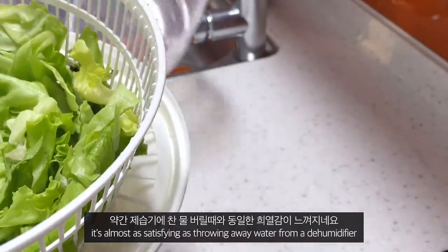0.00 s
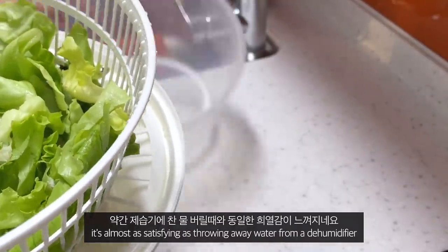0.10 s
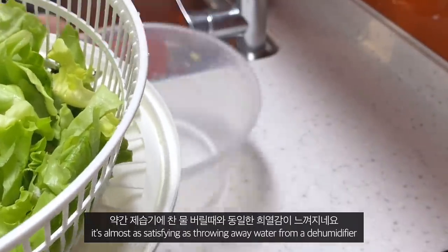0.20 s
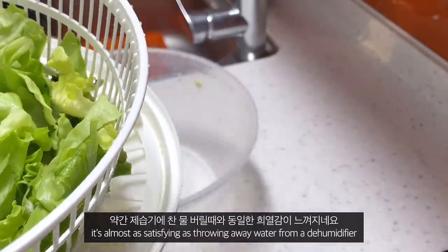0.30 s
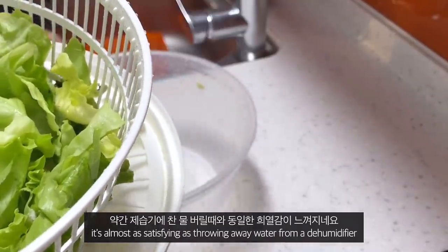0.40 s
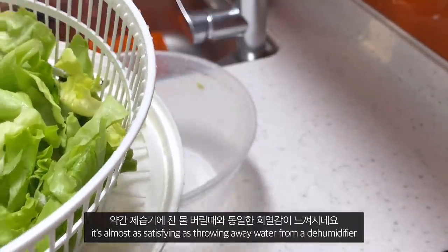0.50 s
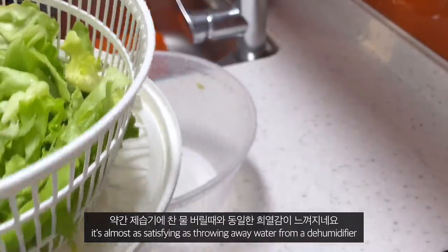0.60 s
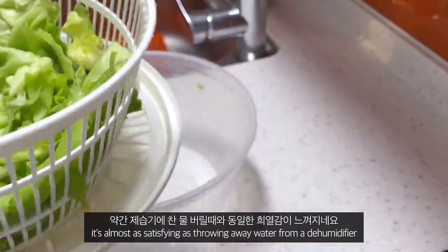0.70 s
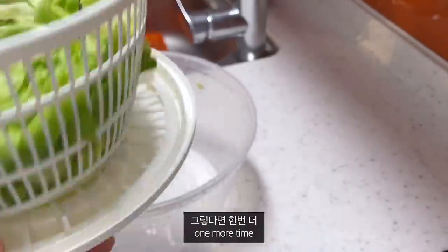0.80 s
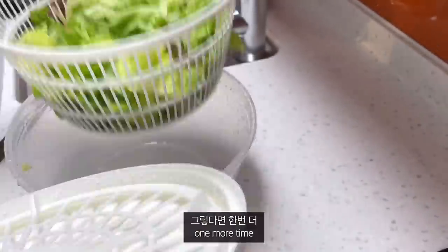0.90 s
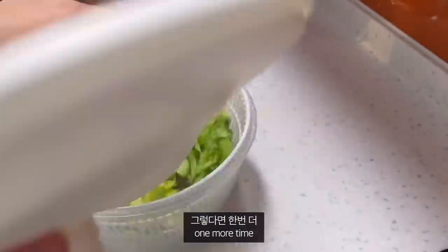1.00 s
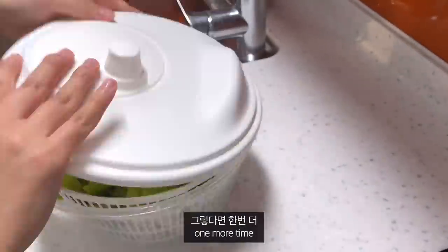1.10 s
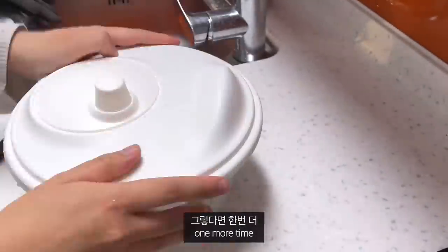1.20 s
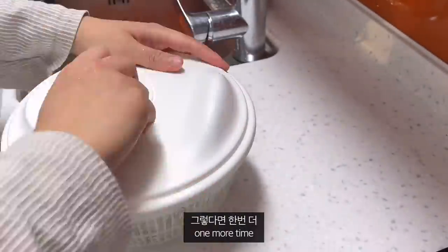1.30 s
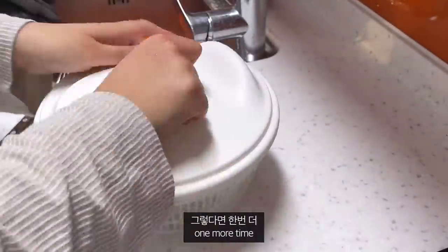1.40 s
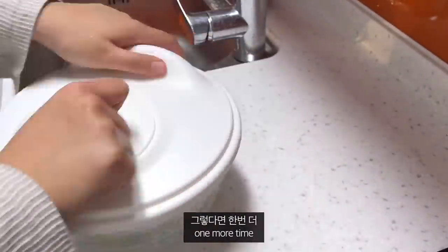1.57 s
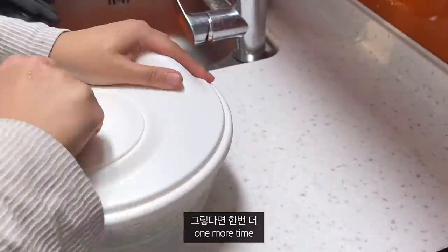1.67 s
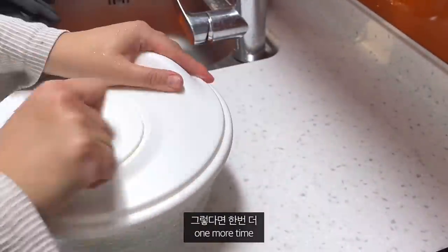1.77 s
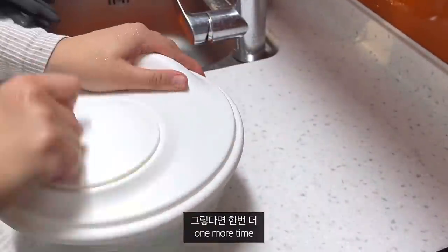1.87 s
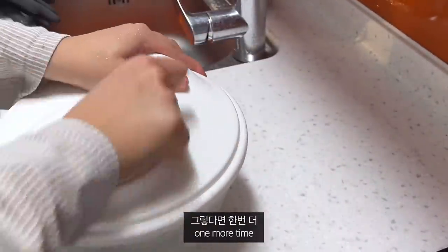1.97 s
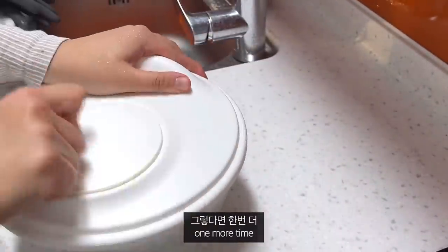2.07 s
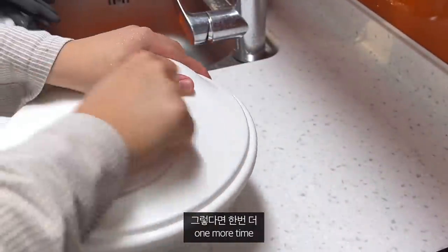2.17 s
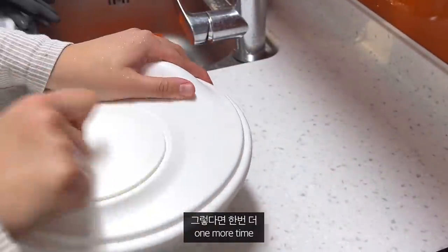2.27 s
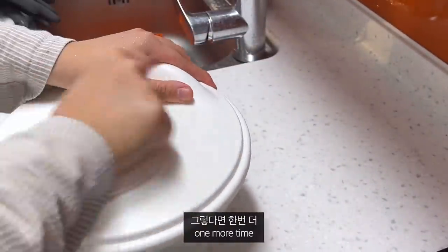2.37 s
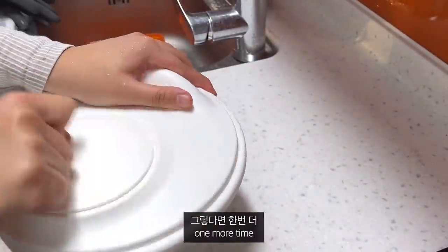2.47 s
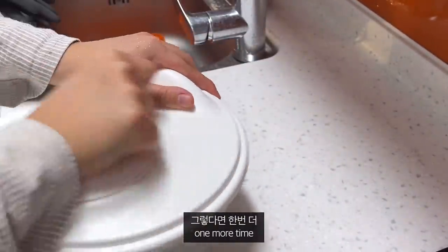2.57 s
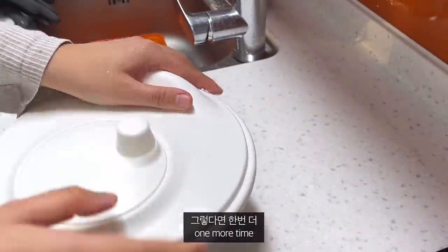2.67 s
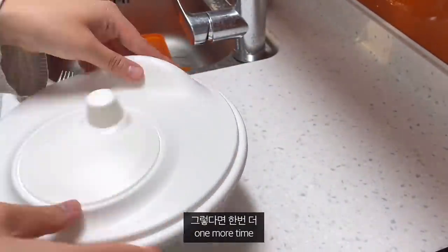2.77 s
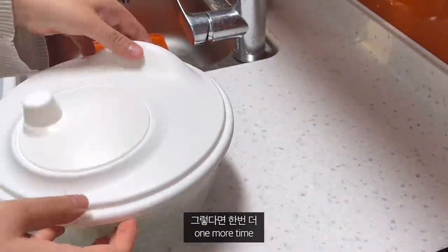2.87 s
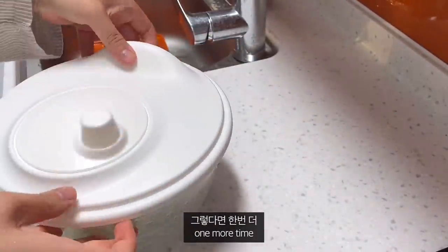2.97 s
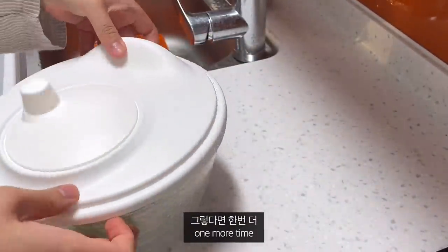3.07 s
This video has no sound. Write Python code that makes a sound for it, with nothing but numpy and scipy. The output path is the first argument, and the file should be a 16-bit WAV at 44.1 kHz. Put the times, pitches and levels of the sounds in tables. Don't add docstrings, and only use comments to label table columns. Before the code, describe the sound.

A plastic salad spinner is set down, clattered together, cranked in quick toothy bursts, then whirs on

```python
import sys
import numpy as np
from scipy import signal
from scipy.fft import rfft, irfft, next_fast_len
from scipy.io import wavfile
from scipy.ndimage import uniform_filter1d, map_coordinates

SR = 44100
rng = np.random.default_rng(int(sys.argv[2]) if len(sys.argv) > 2 else 0)


def master(y):
    cut = np.clip(np.atleast_2d(y).T, -1, 1)
    pcm = np.round(cut * 32767)
    wavfile.write(sys.argv[1], SR, pcm.astype(np.int16))


def volts_from_db(level):
    exponent = np.asarray(level, float) / 20
    return 10 ** exponent


N = 138915
T = np.arange(N) / SR
SCENE_CHANGE_S = 0.786

# pitch in Hz, level in dB, time to fade by 60 dB in seconds.
BOWL_NOTES = [(250, -9, 0.065), (334.4, -7, 0.086), (437, -6.5, 0.077), (543, -7, 0.078), (705, 6.5, 0.029),
              (950, -19, 0.073), (1282, -5.5, 0.029), (1700, -12, .03), (2035, -14, 0.044),
              (2303, -18.5, 0.058), (3080, -41, .05)]
# start in seconds, level in dB.
BOWL_LANDINGS = [
    (.2433, -6),
    (.251, -15.5),
    (.266, -17.5),
    (.292, -35),
    (.352, -39),
    (.362, -28),
]
# frequency in Hz, level in dB per Hz.
BOWL_CRACK = [(120, -17.5), (760, -26.5), (2280, -32.5), (7500, -55), (9000, -83)]
# start in seconds, level in dB.
BOWL_TICKS = [(0.634, -28.5), (0.667, -23), (0.6879, -28)]
# start in seconds, level in dB, rise in seconds, 60 dB fade in seconds.
CUPBOARD_BOOMS = [
    (0.245, -13.5, 0.044, 0.12),
    (0.39, -27.5, 0.048, 0.099),
]
# start in seconds, peak in dB, own pitch in Hz, hollow thump over crack in dB.
CLATTER_HITS = [(.936, -36, 5100, -1), (0.9489, -18, 2190, -15.5), (0.977, -28, 3100, -40),
                (0.9828, -10, 3150, -21), (1.012, -27, 2350, -1.5), (1.052, -19, 4300, -15),
                (1.0767, -3, 1916, -27), (1.0915, -10, 1740, -36), (1.1039, -9.5, 1663, -11),
                (1.1204, -5.5, 1517, -24), (1.1302, -13.5, 1500, -8), (1.167, -19, 4200, -4),
                (1.1781, -14, 1104, -10), (1.1926, -8.5, 3020, -11), (1.1973, -4.5, 769, -20),
                (1.2638, -13.5, 1413, -6.5), (1.3071, -24, 2100, -3.5), (1.35, -8, 1623, 1),
                (1.503, -28, 3040, -9), (1.5309, -23.5, 2024, -4), (1.5981, -21.5, 3010, -8.5),
                (1.6344, -45, 594, 21)]
# frequency in Hz, level in dB per Hz.
PLASTIC_CRACK = [(120, -13), (500, -9), (1740, -4), (6500, -7), (14100, -16.5), (17000, -37)]
# pitch in Hz, level in dB, time to fade by 60 dB in seconds.
LID_NOTES = [(265.4, -8.5, 0.069), (313.6, -5, 0.13), (516, -7.5, 0.074), (670, 4, 0.056),
             (1050, 3.5, 0.014), (2070, -4, 0.038)]
# start in seconds, peak in dB.
RIM_GRAZES = [(2.421, -8.5), (2.635, -10), (2.688, -26), (2.717, -12.5), (2.745, -30), (2.779, -23),
              (2.795, -9.5), (2.858, -8), (2.89, -19.5), (2.95, -13), (2.966, -15.5), (3.073, -15.5)]
# start in seconds, length in seconds, level in dB, gear teeth passing in Hz.
CRANK_STROKES = [(1.714, 0.0555, -28.5, 520), (1.814, 0.03614, -24, 637.5), (1.886, 0.037, -22, 665),
                 (1.961, 0.0348, -22.5, 664.7), (2.022, 0.0422, -20, 700), (2.091, 0.0314, -22, 680),
                 (2.161, .032, -22, 679), (2.227, 0.0374, -21, 670), (2.286, 0.032, -20.5, 688),
                 (2.323, 0.0095, -26.5, 659.8), (2.361, 0.0245, -19.5, 669.2), (2.43, 0.0354, -21, 679.6),
                 (2.488, 0.0456, -20.5, 690), (2.571, 0.039, -25, 665)]
# multiple of the tooth rate, level in dB.
GEAR_OVERTONES = [(1, 6.5), (2, -4), (3, 1.5), (5, -0.5)]
# frequency in Hz, level in dB per Hz.
GRIND_COLOUR = [(120, -45), (220, -13.5), (942, -18), (3270, -10.5), (6500, -8.5), (15500, -25),
                (16050, -70)]
# frequency in Hz, width in Hz, level in dB.
SHELL_PEAKS = [(700, 75, 19), (1500, 44, 11), (1900, 230, 7.5), (3170, 620, 10.5)]
# start in seconds, level in dB.
BOWL_JOLTS = [(1.82, -27.5), (2.094, -21.5), (2.364, -25), (2.578, -17.5)]
# time in seconds, level in dB.
BASKET_LEVEL = [
    (1.36, -45),
    (1.64, -39),
    (1.75, -30.5),
    (2.2, -29.5),
    (2.621, -30),
    (2.9, -34),
    (3.15, -39.5),
]
# frequency in Hz, level in dB per Hz.
WHIRR_COLOUR = [(100, -100), (214, -7), (690, -12.5), (3000, -22.5), (6500, -21), (8500, -26),
                (15600, -25.5), (16050, -76)]
# start in seconds, peak in dB, own pitch in Hz.
SETTLING_TAPS = [(1.114, -11.5, 1560), (1.1235, -11.5, 1220), (1.148, -31, 4000), (1.2055, -14, 3100),
                 (1.212, -16.5, 1580), (1.255, -34, 6000), (1.369, -26, 3500), (1.404, -28.5, 1610),
                 (1.419, -36.5, 5060), (1.431, -38, 2980), (1.4587, -31, 2002), (1.584, -33.5, 6000),
                 (1.636, -28.5, 640), (1.658, -32, 1530), (1.9665, -18, 3270), (1.987, -19, 5230),
                 (2.0245, -19, 2100), (2.062, -20, 5900), (2.096, -23.5, 3000), (2.166, -14, 2890),
                 (2.609, -21.5, 5200), (2.66, -24.5, 3350), (2.686, -17.5, 1800), (2.697, -35, 1900),
                 (2.746, -25.5, 5540), (2.751, -19, 800), (2.782, -29, 6500), (2.863, -25, 5460),
                 (2.905, -32, 1700), (3.006, -37, 9160), (3.022, -26, 1100), (3.037, -28, 1780),
                 (3.054, -26, 900), (3.085, -28, 1090), (3.122, -32, 1300)]
# start in seconds, length in seconds, level in dB, centre in Hz.
BRUSHES = [(.401, 0.044, -71, 11500), (.48, .02, -60, 12100), (0.518, 0.046, -62, 10500),
           (0.625, 0.011, -56, 11300), (0.658, 0.037, -59, 3750), (0.756, 0.025, -72, 11500),
           (.812, 0.009, -65, 8000), (0.826, 0.02, -52.5, 12600), (1.08, .025, -29, 1850),
           (1.109, 0.029, -27.5, 1530), (0.872, 0.0082, -53, 12600), (0.917, 0.014, -53, 13000),
           (1.052, 0.0073, -41, 5050), (1.384, 0.019, -50, 9000), (1.493, 0.022, -48, 5000),
           (1.525, 0.022, -43.5, 4840), (1.66, 0.041, -52, 4000)]
# start in seconds, level in dB, pitch in Hz.
SINK_DROPS = [(0.2044, -30.5, 3170), (0.4504, -28, 2940), (0.5496, -31, 3400), (0.7362, -32, 2960)]
# pitch in Hz, width in Hz, level in dB.
HUM_SLOW = [(154.3, 8.3, -46), (96.7, 28, -50.5), (55.2, 8.4, -56)]
# pitch in Hz, width in Hz, level in dB.
HUM_FAST = [(659.4, 24, -45), (523, 23, -48)]
# frequency in Hz, level in dB per Hz.
AIR_SLOW = [(25, -27), (150, 1), (500, -8), (7000, -35.5), (11000, -30), (15000, -45)]
# frequency in Hz, level in dB per Hz.
AIR_FAST = [(120, -62), (210, 10.5), (650, -3), (900, -2.5), (8000, -16.5), (15500, -18), (16000, -70)]
# frequency in Hz, time to fade by 60 dB in seconds.
KITCHEN_ECHO = [(200, 0.57), (2000, 0.24), (10000, 0.12)]
# frequency in Hz, likeness from 0 to 1.
ALIKE_SLOW = [(60, 0.84), (950, 0.12), (15000, 0.13)]
# frequency in Hz, likeness from 0 to 1.
ALIKE_FAST = [(60, 0.97), (380, 1), (2380, 0.45), (15000, 0.13)]
# frequency in Hz, likeness from 0 to 1.
ALIKE_CRACK = [(60, 1), (500, 0.91), (1400, 0.2), (2800, 0.58), (15000, 0.2)]
# frequency in Hz, left over right in dB.
LEAN_SLOW = [(60, -4), (950, 1.5), (15000, 2)]
# frequency in Hz, left over right in dB.
LEAN_FAST = [(200, 0), (700, -3), (1400, 9.5), (2800, 1), (15000, 2.5)]


def unit(x):
    return x / np.sqrt(np.mean(x ** 2) + 1e-20)


def along(points, hz):
    f, value = np.transpose(points)
    return np.interp(np.log(hz + 1), np.log(f + 1), value)


def wobble(rate):
    return map_coordinates(rng.standard_normal(int(N * rate / SR) + 4), [T * rate])


def filtered(x, response):
    m = next_fast_len(N + SR // 2)
    return irfft(rfft(x, m) * response(np.fft.rfftfreq(m, 1 / SR)), m)[..., :N]


def peak(f, hz, width):
    return 1j * f * width / (hz * hz - f * f + 1j * f * width)


def noise(spectrum, alike, peaks=()):
    def shape(f):
        turn = np.arccos(np.clip(along(alike, f), -1, 1)) / 2
        body = 1 + sum(volts_from_db(db) * np.abs(peak(f, hz, width)) for hz, width, db in peaks)
        return volts_from_db(along(spectrum, f)) * body * [np.cos(turn), np.sin(turn)]
    mid, side = filtered(rng.standard_normal((2, N)), shape)
    return unit(np.array([mid + side, mid - side]))


def patchy(x, depth_db):
    z = signal.stft(x, nperseg=256)[2]
    field = uniform_filter1d(rng.standard_normal(z.shape[1:]), size=4, axis=0)
    field = uniform_filter1d(field, size=3, axis=1)
    return unit(signal.istft(z * volts_from_db(depth_db * unit(field)), nperseg=256)[1][:, :N])


def hits(rows, modes, crack, attack_s, scatter_db, life_s):
    roughness = 7e-5
    out, t = np.zeros((2, N + SR)), np.arange(SR // 7) / SR
    hz, level, t60 = np.transpose(modes)[:, :, None]
    crack = np.pad(crack, ((0, 0), (0, SR)))
    for s, db, ring_db, own_hz in rows:
        i = round(s * SR)
        level_draw, pitch_draw = rng.standard_normal((2, len(modes), 1))
        steps = rng.standard_normal((len(modes) + 1, len(t)))
        drift = uniform_filter1d(np.cumsum(steps, axis=1), size=24)
        phase = 2 * np.pi * hz * (1 + 0.016 * pitch_draw) * t + roughness * hz * drift[1:]
        ring = (volts_from_db(level + scatter_db * level_draw - 60 * t / t60) * np.sin(phase)).sum(0)
        own = volts_from_db(1 - 60 * t / 0.059) + volts_from_db(16.5 - 60 * t / 0.0099)
        own = own * np.sin(2 * np.pi * own_hz * t + .2 * drift[0])
        scrape, click = volts_from_db(-60 * t / life_s), volts_from_db(20 - 60 * t / 0.0049)
        burst = (scrape + click) * crack[:, i:i + len(t)]
        onset = 1 - np.exp(-t / attack_s)
        out[:, i:i + len(t)] += (volts_from_db(db) * (burst + own) + volts_from_db(ring_db) * ring) * onset
    return out[:, :N]


def bowl():
    landings = [(s, db - 14, db - 0.5, 1300) for s, db in BOWL_LANDINGS]
    ticks = [(s, db - 22.5, db - 44, 1400) for s, db in BOWL_TICKS]
    boom = np.zeros(N)
    for s, db, rise, t60 in CUPBOARD_BOOMS:
        t = np.clip(T - s, 0, 1)
        swell = np.clip(t / rise, 0, 1) * volts_from_db(db - 60 * np.clip(t - rise, 0, 1) / t60)
        boom += swell * np.sin(2 * np.pi * 152.6 * t)
    crack = noise(BOWL_CRACK, ALIKE_SLOW)
    return boom + hits(landings + ticks, BOWL_NOTES, crack, attack_s=0.00098, scatter_db=-2.0, life_s=0.12)


def clatter():
    rows = [(s, db - 14, db + thump_db - 2.0, hz) for s, db, hz, thump_db in CLATTER_HITS]
    rim = [(s, db - 20.5, db - 20, 1500) for s, db in RIM_GRAZES]
    crack, scrape = noise(PLASTIC_CRACK, ALIKE_CRACK), noise(GRIND_COLOUR, ALIKE_FAST)
    return (hits(rows, LID_NOTES, crack, attack_s=0.0012, scatter_db=0.0, life_s=0.051)
            + hits(rim, LID_NOTES, scrape, attack_s=0.003, scatter_db=3.0, life_s=0.023))


def crank():
    rise_s, fall_s, sag, jitter = 0.0066, 0.0054, .05, 0.02116
    load, rate = np.zeros(N), np.full(N, 670.)
    for s, length, db, hz in CRANK_STROKES:
        t = T - s
        load += volts_from_db(db) * np.clip(t / rise_s, 0, 1) * np.exp(-np.clip(t - length, 0, 1) / fall_s)
        sagging = hz * (1 + sag * (.5 - np.clip(t / length, 0, 1.5)))
        rate = np.where(t > 0, sagging, rate)
    turn = 2 * np.pi * np.cumsum(rate * (1 + jitter * wobble(250))) / SR
    tone = sum(volts_from_db(db + 2.5 * wobble(60)) * np.sin(k * turn + rng.uniform(0, 4.15)) for k, db in GEAR_OVERTONES)
    gate = 1 + 0.29 * np.sin(turn)
    flutter = volts_from_db(1.4 * wobble(150) + 1.6 * wobble(1500))
    grind = unit(gate * flutter * patchy(noise(GRIND_COLOUR, ALIKE_FAST, SHELL_PEAKS), depth_db=3.5))
    jolts = [(s, db - 4.0, db, 520) for s, db in BOWL_JOLTS]
    jolt = hits(jolts, LID_NOTES, grind, attack_s=0.0014, scatter_db=0.5, life_s=0.009)
    return jolt + load * (volts_from_db(-2.5) * unit(tone) + volts_from_db(0.5) * grind)


def basket():
    fizz_growth, fizz_hz = 1.92, 2300
    s, db = np.transpose(BASKET_LEVEL)
    level = np.interp(T, s, db, left=-120)
    whirr = patchy(noise(WHIRR_COLOUR, ALIKE_FAST, SHELL_PEAKS), depth_db=2.5)
    fizz = filtered(whirr, lambda f: f ** 2 / (f ** 2 + fizz_hz ** 2))
    fizz_db = (fizz_growth - 1) * (level - max(db)) + 3 + 1.7 * wobble(90)
    unsteady = volts_from_db(level + 1.2 * wobble(40) + 1.5 * wobble(200))
    return unsteady * (whirr - fizz + volts_from_db(fizz_db) * fizz)


def taps():
    rows = [(s, db - 15.5, db - 21.5, hz) for s, db, hz in SETTLING_TAPS]
    crack = noise(PLASTIC_CRACK, ALIKE_CRACK)
    dull = filtered(crack, lambda f: 1 / (1 + (f / 3500) ** 2))
    low = [row for row in rows if row[-1] < 2000]
    high = [row for row in rows if row[-1] >= 2000]
    return sum(hits(group, LID_NOTES, x, attack_s=0.00063, scatter_db=4.0, life_s=0.027)
               for group, x in ((low, dull), (high, crack)))


def rustles():
    rise_s, fall_s, wide = 0.0022, 0.0074, 0.3
    out, t = np.zeros((2, N)), np.arange(SR // 8) / SR
    for s, length, db, hz in BRUSHES:
        edges = np.clip([hz * (1 - wide), hz * (1 + wide)], 500, 15500)
        sos = signal.butter(3, edges, 'band', fs=SR, output='sos')
        band = unit(signal.sosfilt(sos, rng.standard_normal((2, len(t)))))
        swell = np.clip(t / rise_s, 0, 1) * np.exp(-np.clip(t - length, 0, 1) / fall_s)
        out[:, round(s * SR):][:, :len(t)] += volts_from_db(db) * swell * band
    return out * volts_from_db(3.5 * wobble(300) + 2.5 * wobble(60))


def drips():
    out = np.zeros(N)
    for s, db, hz in SINK_DROPS:
        t = np.clip(T - s, 0, 1)
        band = unit(filtered(rng.standard_normal(N), lambda f: peak(f, hz, 640) ** 2))
        out += volts_from_db(db - 24.5 - 60 * t / 0.19) * (T > s) * band
    return out * volts_from_db([[2.5], [-2.5]])


def hum(lines):
    out = np.zeros(N)
    for hz, width, db in lines:
        band = filtered(rng.standard_normal(N), lambda f: peak(f, hz, width) ** 2)
        z = signal.hilbert(band, next_fast_len(N))[:N]
        out += volts_from_db(db) * unit(z.real / (np.abs(z) + 1e-9) ** .6)
    return out


def room(x, speed):
    hz, t, z = signal.stft(rng.standard_normal((2, SR // 2)), SR, nperseg=256)
    fade = volts_from_db(-60 * t * speed / along(KITCHEN_ECHO, hz)[:, None])
    tail = signal.istft(z * fade, SR, nperseg=256)[1]
    late = np.pad(x.mean(0), (200, 0))[None]
    return signal.fftconvolve(late, tail / np.linalg.norm(tail[0]), axes=1)[:, :N]


def lean(x, balance):
    return filtered(x, lambda f: volts_from_db(along(balance, f) / 2 * np.array([[1], [-1]])))


def slow_scene(brush):
    near = bowl() + drips()
    air = volts_from_db(-54 + 1.5 * wobble(15)) * noise(AIR_SLOW, ALIKE_SLOW)
    slow = near + volts_from_db(-9.5) * room(near, speed=1) + hum(HUM_SLOW) + air
    bass_side = filtered((slow[0] - slow[1]) / 2, lambda f: 1 / (1 + (f / 220) ** 2))
    slow = slow - bass_side * [[1], [-1]]
    slow = filtered(slow + brush, lambda f: (np.abs(f - 8150) > 450) * (f < 14300))
    return lean(slow, LEAN_SLOW)


def fast_scene(brush):
    near = clatter() + crank() + basket()
    air = volts_from_db(-53.5 + 0.88 * wobble(7.2)) * patchy(noise(AIR_FAST, ALIKE_FAST), depth_db=2.5)
    fast = near + volts_from_db(-20.5) * room(near, speed=1.2) + hum(HUM_FAST) + air + taps()
    return filtered(lean(fast + brush, LEAN_FAST), lambda f: 1 / (1 + (150 / (f + 1)) ** 5))


def scene():
    after = np.clip((T - SCENE_CHANGE_S) / 0.0035, 0, 1)
    fade_in = np.clip(T / 0.0074, 0, 1)
    brush = rustles()
    return slow_scene(brush * (1 - after)) * (1 - after) * fade_in + fast_scene(brush * after) * after


def top_cut(x):
    return signal.sosfilt(signal.butter(12, 16990, fs=SR, output="sos"), x)


def record(dry):
    return top_cut(dry)


dry = scene()
out = record(dry)
master(out)
```